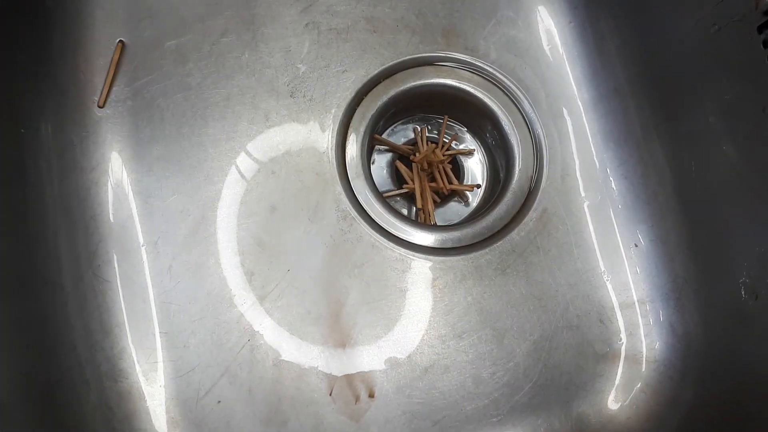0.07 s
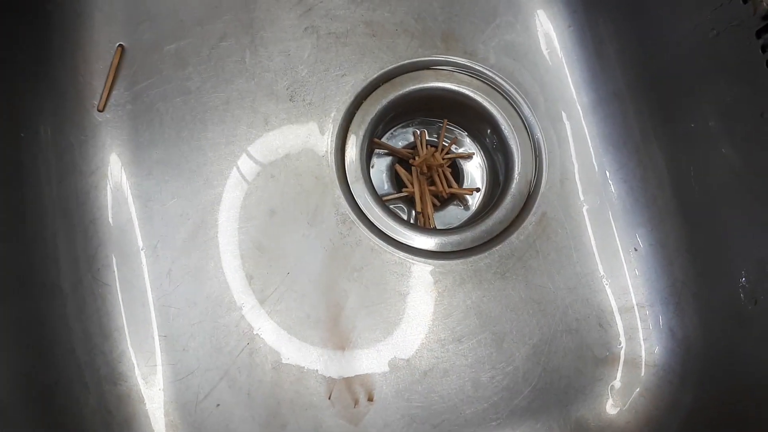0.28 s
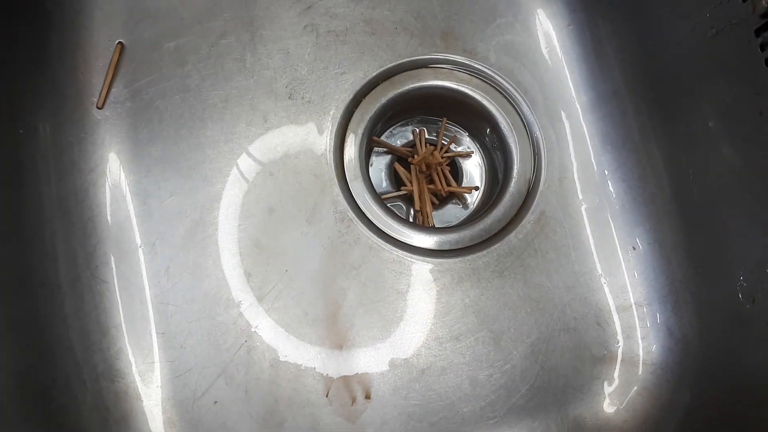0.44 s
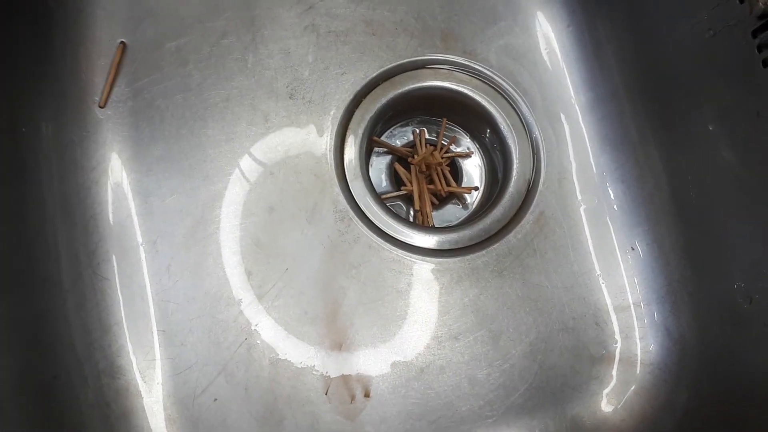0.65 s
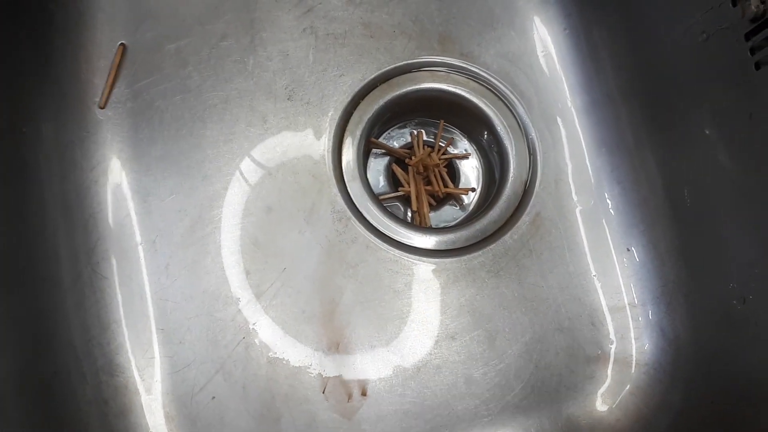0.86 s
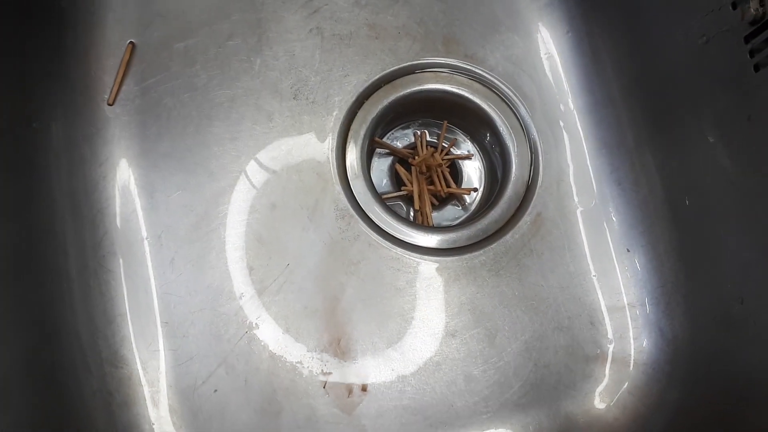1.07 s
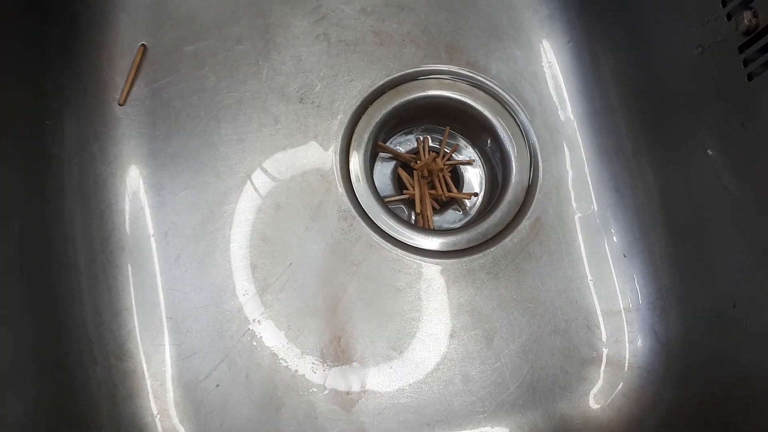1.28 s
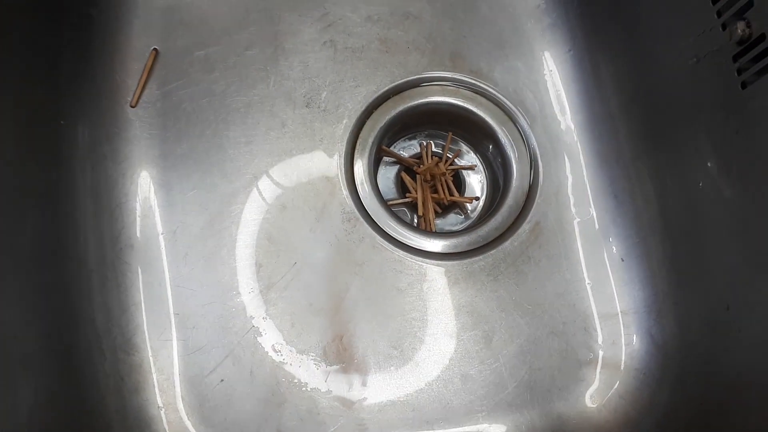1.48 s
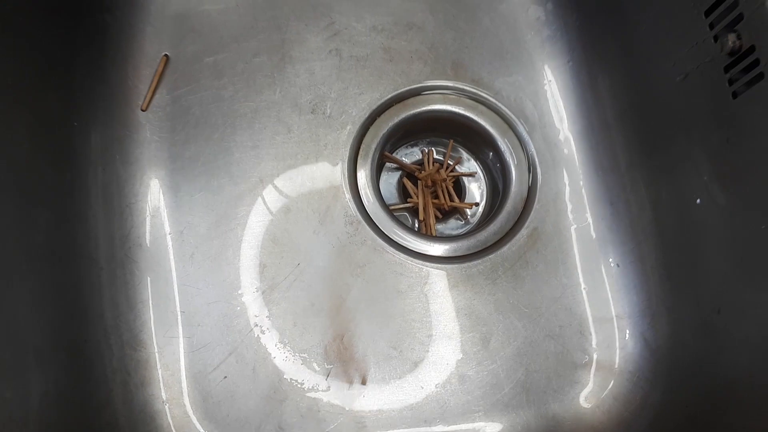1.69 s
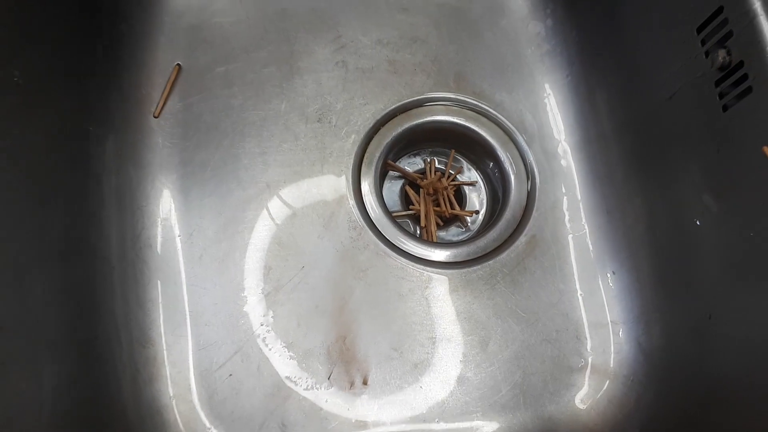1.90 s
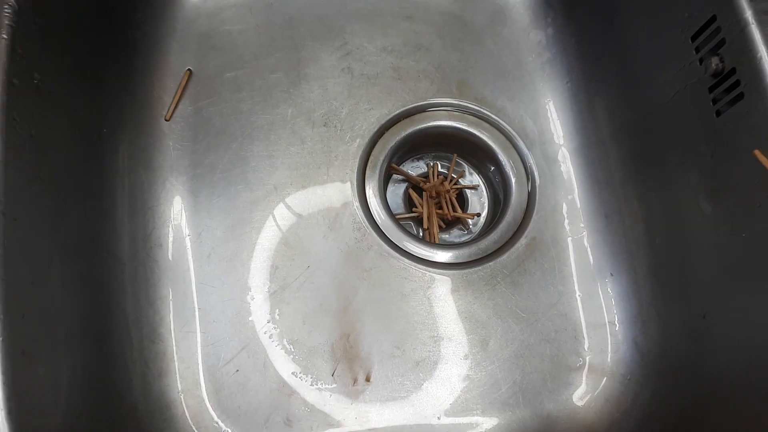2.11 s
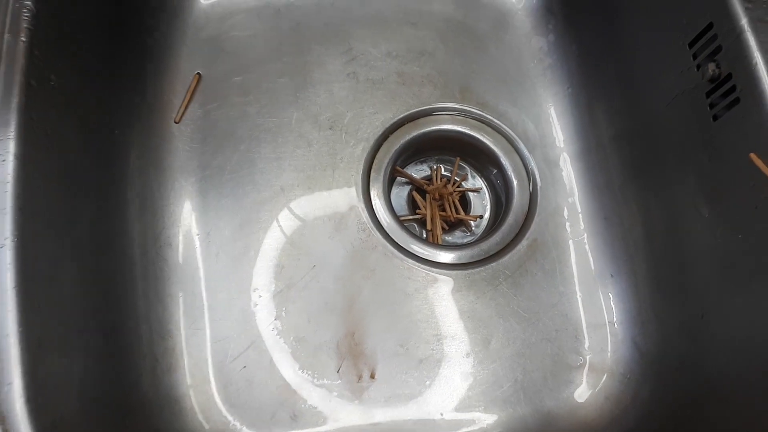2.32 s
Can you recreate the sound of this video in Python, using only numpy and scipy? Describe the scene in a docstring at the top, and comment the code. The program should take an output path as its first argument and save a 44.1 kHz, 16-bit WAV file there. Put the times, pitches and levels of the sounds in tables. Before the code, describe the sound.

Water gurgles down a steel sink drain in uneven gulps, then stops.

```python
"""Last water down a steel sink

Heard from just above the basin, air breaks through the plug of water in uneven gulps. Each one
thumps the pipe, rings a bubble, snaps shut and throws a little spray, and pipe and basin ring along.
Big air pockets glug and small bubbles plink in the strainer; then a low room rumble is left,
with soft handling bumps on the microphone."""
import sys
import numpy as np
from scipy import signal
from scipy.fft import rfft, irfft, next_fast_len
from scipy.io import wavfile

SR = 44100
rng = np.random.default_rng(int(sys.argv[2]) if len(sys.argv) > 2 else 0)


def dump(signal):
    """Clip the signal to [-1, 1] and save it as 16-bit WAV at the path in sys.argv[1]."""
    limited = np.clip(np.atleast_2d(signal).T, -1, 1)
    pcm = np.round(limited * 32767).astype(np.int16)
    wavfile.write(sys.argv[1], SR, pcm)


N = 108045
RING_TIME = np.arange(int(.3 * SR)) / SR   # the clock of one short sound, in seconds


def from_db(db):
    """Turns decibels into a number to multiply a sound by."""
    return 10 ** (np.asarray(db) / 20)


def rms_one(x):
    """Scales a sound so that its average strength (rms) is 1."""
    return x / np.sqrt(np.mean(x ** 2) + 1e-20)


def at_level(x, db, first_s=.016):
    """Scales a short sound so that its first moments have this average level."""
    return x * from_db(db) / np.sqrt(np.mean(x[:, :int(first_s * SR)] ** 2) + 1e-20)


def at_hz(points, hz):
    """Reads a curve of (pitch, value) points at the given pitches."""
    known, values = np.transpose(points)
    return np.interp(np.log(np.maximum(hz, 1)), np.log(known), values)


def level_curve(points):
    """Joins (time, level) points into a volume curve for the whole scene."""
    return from_db(np.interp(np.arange(N) / SR, *np.transpose(points)))


def pan(db):
    """Volumes for the two ears, with the left this many dB above the right."""
    return rms_one(from_db(np.array([[db], [-db]]) / 2))


def dying(fade_s):
    """A smooth fade that falls by 60 dB in the fade time."""
    return np.exp(-np.log(1000) * RING_TIME / fade_s)


def add(out, start_s, sound):
    """Mixes a short sound in at the given time."""
    start = int(start_s * SR)
    out[:, start:start + sound.shape[1]] += sound[:, :N - start]


def butter(x, hz, kind, order=2):
    """Keeps the lows, the highs or a band between two pitches."""
    return signal.sosfilt(signal.butter(order, hz, kind, fs=SR, output="sos"), x)


def resonate(x, hz, q):
    """Brings out one pitch; a higher q gives a purer, longer ring."""
    return signal.lfilter(*signal.iirpeak(hz, q, fs=SR), x)


def noise(spectrum, size, lean=0):
    """Stereo noise with the given tone colour; lean shifts it towards the drain on the right."""
    # how alike the two ears hear it: (pitch [Hz], likeness [0 to 1])
    likeness = [(30, .95), (80, .99), (250, .97), (600, .8), (1200, .1), (16000, .1)]
    # the drain lies to the right: (pitch [Hz], left minus right at lean=1 [dB])
    drain_side = [(300, 0), (700, -1.5), (1400, -12), (2100, -7), (2800, -3), (4500, -5.5), (12000, -3.5)]
    padded = next_fast_len(size)
    mid, side = rfft(rng.standard_normal((2, padded)))
    hz = np.arange(len(mid)) * SR / padded
    alike = at_hz(likeness, hz)
    ears = np.array([[1], [-1]])
    both = np.sqrt(1 + alike) * mid + np.sqrt(1 - alike) * side * ears
    colour = from_db(at_hz(spectrum, hz) + lean * ears * at_hz(drain_side, hz) / 2)
    return rms_one(irfft(both * colour, padded)[:, :size])


def room_and_pipe_hum(room_db=-62, hum_hz=174.4):
    """The room rumbles under soft microphone bumps, while the air in the pipe hums on one note."""
    # tone colour of the quiet room: (pitch [Hz], relative level [dB])
    room_colour = [(20, -13.5), (33, -14), (48, -4.5), (62, -4), (85, -1), (130, -11.5), (180, -7.5),
                   (250, -24), (450, -28), (1000, -32), (3000, -37), (9000, -42.5), (15500, -39.5)]
    # the pipe's lingering note: (time [s], level [dB])
    hum_levels = [(0, -75), (.2, -63.5), (1.35, -54), (1.5, -67.5), (1.65, -60.5), (1.76, -70.5),
                  (2.45, -71.5)]
    hum = resonate(noise(room_colour, N), hum_hz, q=12)
    hum = rms_one(resonate(hum, hum_hz, q=2.1))
    air = from_db(room_db) * noise(room_colour, N)
    return air + handling_bumps(air) + level_curve(hum_levels) * hum


def handling_bumps(air, below_hz=220):
    """Handling the microphone gives soft low bumps, made by turning the room's bass up and down."""
    # the bumps and the lulls between them: (time [s], bass boost [dB])
    bumps = [(0, -2), (.09, 7), (.15, 0.5), (1.4, 3), (1.8, -10.5), (1.95, 3), (2.05, -5), (2.14, 5),
             (2.22, -6.5), (2.31, 6.5), (2.45, -4.5)]
    bass = signal.sosfiltfilt(signal.butter(2, below_hz, fs=SR, output="sos"), air)
    return bass * (level_curve(bumps) - 1)


def trickle(bubbles_per_s=700, spread_db=5.5, note_count=16):
    """Countless tiny bubbles burst at random in the strainer while water still runs."""
    # the trickle grows, then dies away: (time [s], level [dB])
    levels = [(0, -72), (.1, -68.5), (.19, -55.5), (.3, -60.5), (.9, -62), (1.2, -68.5), (1.35, -92),
              (2.45, -100)]
    bursts = rng.random(N) < bubbles_per_s / SR
    clicks = bursts * from_db(spread_db * rng.standard_normal(N)) * rng.choice([-1, 1], N)
    note_of_click = rng.integers(0, note_count, N)
    out = np.zeros((2, N))
    for k, hz in enumerate(np.geomspace(1662, 3600, note_count)):
        note = resonate(clicks * (note_of_click == k) + 1e-18, hz, q=30)
        left_flip = [[rng.choice([-1, 1])], [1]]   # flipping some notes in one ear widens the sound
        out += note * pan(db=-2) * left_flip
    return level_curve(levels) * rms_one(butter(out, [1300, 3800], "band", order=3))


def sink_notes():
    """The natural notes of pipe and basin, each fading away as the two ears hear it."""
    # (pitch [Hz], relative level [dB], fade time [s], left minus right [dB], left's head start [rad])
    resonances = [(90, -6, 0.27, 1, -1), (123.1, 0, .25, -2, -0.5), (174.6, 0, 0.3, 1, 0.5),
                  (201.4, -1, 0.13, -1.5, 0), (294.8, -5.5, .17, 1, 1.5), (421, -5.5, .08, -1, -2),
                  (490, 3.5, 0.11, -1.5, 0), (599, -6, 0.16, 0.5, 1.5), (660, -12, .08, 9.5, 2),
                  (781.6, -4, 0.07, -4, -0.2), (840, 0, 0.091, -6.5, 1), (1034, -14, 0.072, -4, 1.5),
                  (1161.5, -6.5, .14, 3.5, -0.5), (1277, 0, 0.07, -5, -1.5), (1324, 4, 0.095, -10, -1.76),
                  (1452.4, 0, 0.049, -13.5, -0.5), (1768, 4.5, 0.075, -18.5, -2.5),
                  (2001, -2.5, .08, -13, 3.36), (2092, 0.5, 0.04, -10.5, 1), (2430, -14, .12, 3.5, 1.64),
                  (2650, -9, 0.091, -2.5, -0.5), (2757, -8.5, 0.042, -3, 1), (2910, -12, 0.13, -3, 1),
                  (2917, -9.5, 0.058, -7.5, -1.9), (3366, -10.5, .05, -6.5, 0.5),
                  (3620, -14, .06, -7.5, -4.94), (4350, -17.5, .07, -8.5, 3.5),
                  (4600, -14.5, 0.029, -7, 1.5)]
    notes = []
    for k, (hz, db, fade_s, pan_db, lead) in enumerate(resonances):
        wave = np.sin(2 * np.pi * hz * RING_TIME + np.array([[lead], [0]]))
        notes.append((-1) ** k * from_db(db) * pan(pan_db) * dying(fade_s) * wave)
    return np.array(notes)


def sink_ring(notes, spread_db=4.5, direct_db=3, direct_s=.004):
    """Pipe, basin and room answer one push of air, never quite the same way twice."""
    # the basin's many other notes blur into noise: (pitch [Hz], relative level [dB])
    blur_colour = [(35, -33), (75, -13.5), (150, 4.5), (350, 2.5), (700, 0.5), (1080, -7.5), (1500, -3),
                   (2150, -6.5), (2480, -21.5), (2800, -8.5), (3500, -6.5), (3850, -22.5), (4700, -17),
                   (5500, -21), (16000, -34)]
    strengths = from_db(rng.normal(0, spread_db, len(notes)))
    ringing = at_level(np.tensordot(strengths, notes, 1), 0)
    basin_fade = from_db(-9) * dying(fade_s=.05)
    room_fade = from_db(-19) * dying(fade_s=.47)
    blur = (basin_fade + room_fade) * noise(blur_colour, len(RING_TIME), lean=1)
    # the first moments reach the ear directly and stand out
    return (ringing + blur) * from_db(direct_db * np.exp(-RING_TIME / direct_s))


def plinks(notes, gain_db=-3):
    """Small bubbles ring on one high note each, coloured by the basin."""
    # bubbles bursting in the strainer: (time [s], relative level [dB], pitch [Hz])
    bubbles = [(.018, -64, 3740), (.147, -54.5, 1693), (.167, -48, 3080), (.194, -56, 3100),
               (.248, -26, 1755), (.259, -50.5, 4350), (.294, -28, 1380), (.305, -43.5, 3420),
               (.324, -48.5, 2780), (.387, -44.5, 2340), (.474, -43, 1820), (.554, -39, 1940),
               (.555, -44, 3090), (.573, -34, 2854), (.603, -40, 2730), (.636, -37.5, 2030),
               (0.645, -35, 1810), (.648, -56.5, 6300), (.698, -54.5, 4400), (.712, -56.5, 3600),
               (.724, -50.5, 3126), (.732, -45.5, 1990), (.758, -52, 3120), (.845, -37, 2870),
               (.878, -42, 4660), (1.057, -41, 2580), (1.113, -36, 1903), (1.195, -47.5, 3200),
               (1.212, -60.5, 4580), (1.284, -55.5, 2220), (2.219, -74, 1050), (2.309, -78.5, 7200)]
    out = np.zeros((2, N))
    for start_s, db, hz in bubbles:
        plink = resonate(sink_ring(notes), hz, q=14)
        plink = resonate(plink, hz, q=3)
        add(out, start_s, at_level(plink, db + gain_db))
    return out


def gulps(notes):
    """Air breaks through the water and rings the sink: a thump, a short bubble note, a snap and spray."""
    # one row per gulp; each part's level is turned down a little in the mix below:
    # (time [s], thump [dB], bubble [dB], bubble pitch [Hz], snap [dB], snap pitch [Hz], spray [dB])
    air_gulps = [(0.207, -29, -24.5, 764, -27.5, 1200, -68.5), (0.228, -44, -26.5, 386, -46, 1690, -64),
                 (0.248, -28, -27, 520, -21, 1590, -55), (0.292, -29.5, -36.5, 920, -26, 1190, -50),
                 (0.306, -24.5, -34, 840, -41, 1200, -53), (0.344, -28.5, -41.5, 770, -32.5, 1680, -60),
                 (0.385, -41, -43, 444, -41.5, 2280, -78), (0.425, -30, -41, 660, -35, 1680, -67.5),
                 (0.441, -42.5, -46, 510, -74, 1420, -69), (0.486, -42, -31.5, 980, -31.5, 1240, -65.5),
                 (0.51, -30.5, -34.5, 714, -39, 2040, -65.5), (0.524, -28.5, -76, 630, -56.5, 1370, -73),
                 (0.573, -24.5, -22.5, 866, -23.5, 1200, -52), (0.585, -33, -44.5, 660, -50.5, 1200, -58),
                 (0.604, -24.5, -23.5, 627, -37.5, 1520, -48), (0.625, -30.5, -54.5, 660, -41, 2940, -60.5),
                 (0.644, -31, -41, 706, -30.5, 2395, -54), (0.66, -35.5, -52.5, 554, -52, 2440, -71.5),
                 (0.697, -30, -29, 502, -41, 1638, -65), (0.711, -43.5, -33.5, 626, -39, 1385, -76),
                 (0.731, -32.5, -38.5, 480, -36.5, 1990, -72), (0.775, -41.5, -36.5, 874, -42, 1900, -72),
                 (0.784, -34, -33, 840, -29.5, 1880, -64.5), (0.812, -31, -31, 386, -36.5, 1570, -61.5),
                 (0.824, -39.5, -48, 440, -46.5, 1510, -67), (0.867, -24.5, -23.5, 830, -22, 1790, -51),
                 (0.879, -38.5, -30.5, 480, -49, 1680, -54), (0.932, -35, -36, 640, -38.5, 1210, -62.5),
                 (0.962, -27, -27.5, 400, -36, 1630, -63.5), (0.974, -43, -47, 404, -43, 2260, -60.5),
                 (1.023, -36, -36, 436, -38, 1770, -65.5), (1.04, -35.5, -44.5, 490, -51, 1620, -83),
                 (1.057, -42, -32, 502, -39, 2570, -68), (1.077, -36.5, -52.5, 400, -66, 2700, -80.5),
                 (1.112, -33.5, -30, 820, -61, 1930, -74), (1.139, -33, -37.5, 587, -46, 1200, -76),
                 (1.158, -41.5, -54, 630, -49, 1280, -75), (1.194, -32, -30, 524, -34, 1480, -66),
                 (1.211, -42.5, -46, 474, -43.5, 3200, -68), (1.245, -33.5, -32, 677, -42.5, 1330, -70.5),
                 (1.263, -35.5, -49, 735, -42.5, 1560, -69), (1.287, -35, -47.5, 545, -65, 1520, -79),
                 (1.338, -43, -44.5, 520, -54.5, 1200, -82), (1.363, -52, -67, 570, -76, 1640, -88)]
    out = np.zeros((2, N))
    for start_s, thump_db, bubble_db, bubble_hz, snap_db, snap_hz, spray_db in air_gulps:
        ring = sink_ring(notes)
        thump = butter(butter(ring, 260, "low", order=3), 72, "high")
        bubble = resonate(butter(ring, [360, 1000], "band"), bubble_hz, q=2.7)
        snap = resonate(butter(ring, [1100, 3700], "band", order=3), snap_hz, q=.9)
        add(out, start_s, at_level(thump, thump_db - 1))
        add(out, start_s, at_level(bubble, bubble_db - .5))
        add(out, start_s, at_level(snap, snap_db - 2))
        add(out, start_s, at_level(spray(), spray_db - 1.5))
    return out


def spray(grain_db=3, spread_db=3.5, fade_in_s=.002):
    """Droplets make a short grainy hiss and set the steel strainer ringing."""
    # tone colour of the fine spray: (pitch [Hz], relative level [dB])
    hiss_colour = [(2500, -25), (4000, -4.5), (4650, -1), (5500, -11), (6500, -4.5), (7800, 2.5),
                   (8700, -16), (11000, -14), (14000, -11), (15800, -15)]
    # the strainer's high notes: (pitch [Hz], relative level [dB])
    strainer_notes = [(4075, -3.5), (4325, -2), (4650, 0), (4790, -5), (5925, -10.5), (6260, -4),
                      (7060, -5.5), (7280, -4.5), (7520, -5.5), (7820, -5.5), (8040, -10)]
    grain_times = RING_TIME[::100]
    grain = np.interp(RING_TIME, grain_times, from_db(grain_db * rng.standard_normal(len(grain_times))))
    hiss = noise(hiss_colour, len(RING_TIME), lean=.93) * grain * dying(fade_s=.092)
    tones = np.array([from_db(db) * np.sin(2 * np.pi * hz * RING_TIME) for hz, db in strainer_notes])
    strengths = from_db(spread_db * rng.standard_normal(len(tones)))
    flips = rng.choice([-1, 1], (2, len(tones)))
    steel = (strengths * flips) @ tones * dying(fade_s=.091) * pan(db=-4)
    fade_in = 1 - np.exp(-RING_TIME / fade_in_s)
    return (at_level(hiss, 0) + at_level(steel, -1.5)) * fade_in


def glugs(fade_in_cycles=.9, rise_per_s=.6):
    """Large bubbles grow into a note that rises slightly as it dies."""
    # big air pockets throbbing in the pipe: (time [s], level [dB], starting pitch [Hz], fade time [s])
    air_pockets = [(.252, -26.5, 101, 0.2), (.296, -20.5, 187, 0.091), (.311, -13, 111, 0.12),
                   (.387, -32.5, 509, 0.17), (0.418, -24, 150, .09), (.522, -20.5, 205, .08),
                   (.606, -23.5, 490, 0.069), (0.646, -25, 150, .1), (.709, -24, 625, .06),
                   (.869, -22.5, 310, 0.12), (.872, -19, 486.4, .1), (.933, -28, 620, 0.058),
                   (1.113, -29, 832, 0.054), (1.262, -35, 140, 0.063), (1.287, -35, 601.6, 0.1),
                   (1.34, -42.5, 528.4, 0.16)]
    out = np.zeros((2, N))
    for start_s, db, hz, fade_s in air_pockets:
        phase = 2 * np.pi * hz * (RING_TIME + rise_per_s * RING_TIME ** 2 / 2)
        fade_in = 1 - np.exp(-RING_TIME * hz / fade_in_cycles)
        add(out, start_s, from_db(db) * pan(0) * fade_in * dying(fade_s) * np.sin(phase))
    return out


def basin_echoes(x):
    """Echoes between the steel walls cancel a few pitches."""
    # the gaps they leave: (pitch [Hz], width [Hz])
    gaps = [(712, 22), (1075, 70.4), (1215, 14), (1895, 89), (2300, 56), (2520, 130), (3015, 50),
            (3850, 160)]
    for hz, width_hz in gaps:
        x = signal.lfilter(*signal.iirnotch(hz, hz / width_hz, fs=SR), x)
    return x


def scene():
    """The gurgle in the basin, over the quiet room and the humming pipe."""
    notes = sink_notes()
    background = room_and_pipe_hum()
    gurgle = gulps(notes) + plinks(notes) + glugs() + trickle()
    return background + basin_echoes(gurgle)


def record(dry, cutoff_hz=15750):
    """Two microphones close together hear the bass alike; the highest treble is cut steeply."""
    # stereo width: (pitch [Hz], boost of the left-minus-right part [dB])
    width = [(30, -6), (90, -17.5), (200, -4), (400, -7), (700, 0.5)]
    size = next_fast_len(N + len(RING_TIME))
    width_gain = from_db(at_hz(width, np.fft.rfftfreq(size, 1 / SR)))
    side = (dry[0] - dry[1]) / 2
    side = irfft(rfft(side, size) * width_gain, size)[:N]
    heard = dry.mean(axis=0) + np.array([side, -side])
    return signal.sosfilt(signal.ellip(10, .1, 80, cutoff_hz, fs=SR, output="sos"), heard)


dry = scene()
out = record(dry)
dump(out)
```